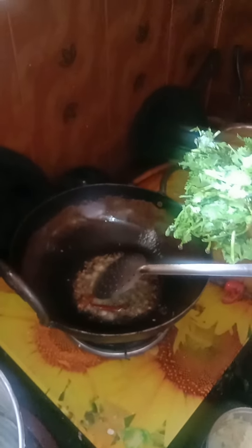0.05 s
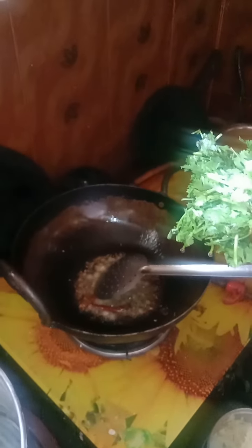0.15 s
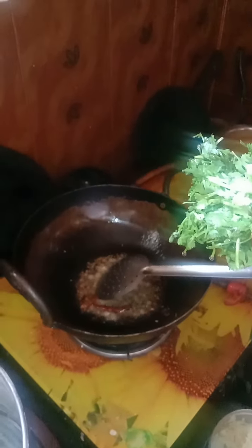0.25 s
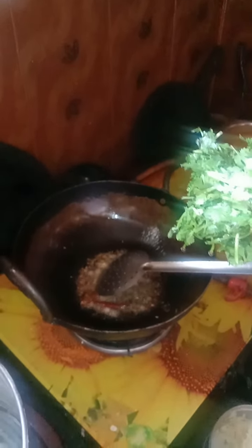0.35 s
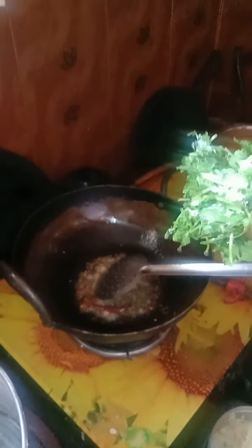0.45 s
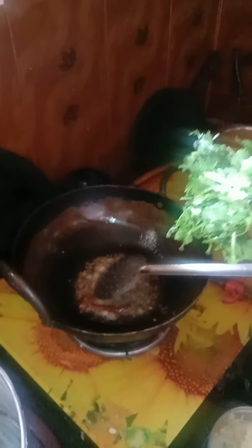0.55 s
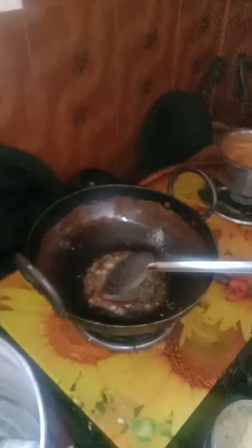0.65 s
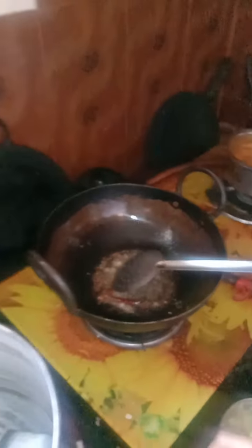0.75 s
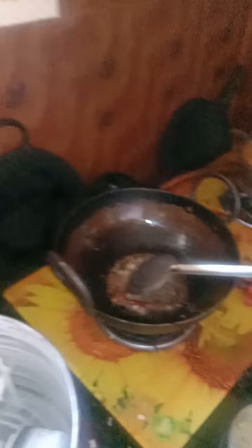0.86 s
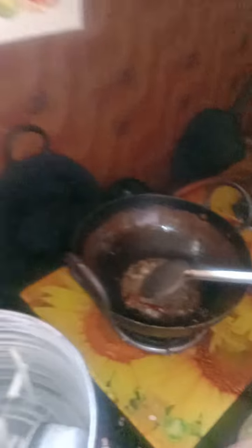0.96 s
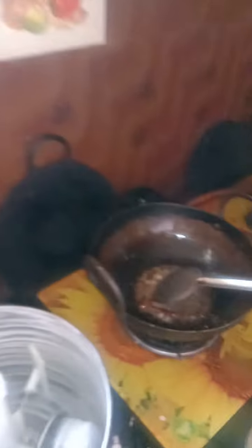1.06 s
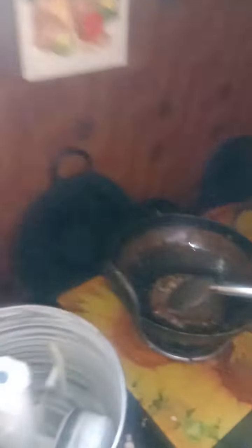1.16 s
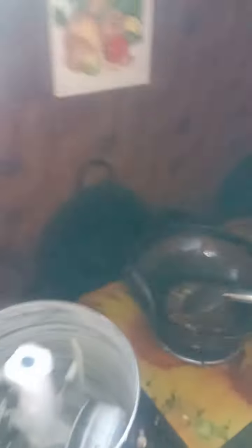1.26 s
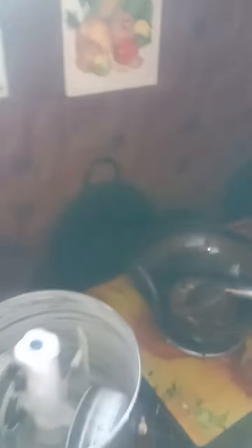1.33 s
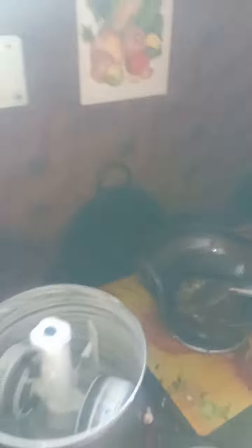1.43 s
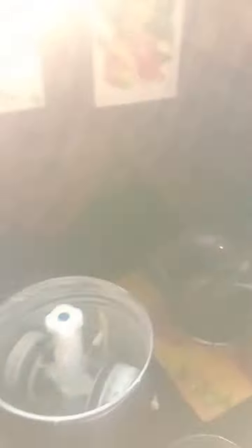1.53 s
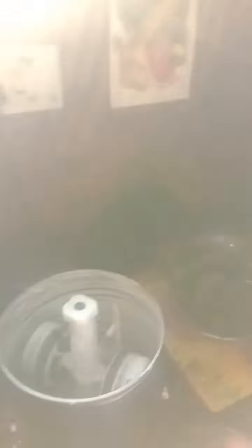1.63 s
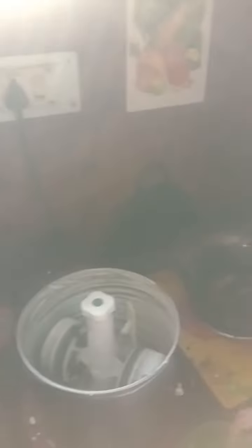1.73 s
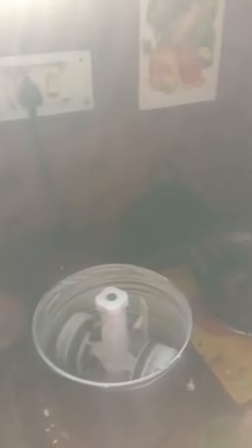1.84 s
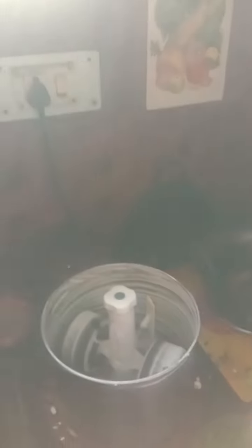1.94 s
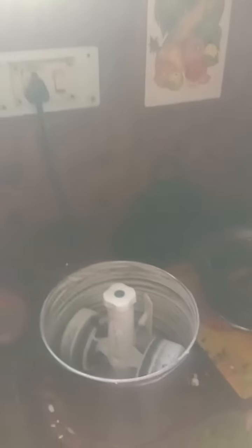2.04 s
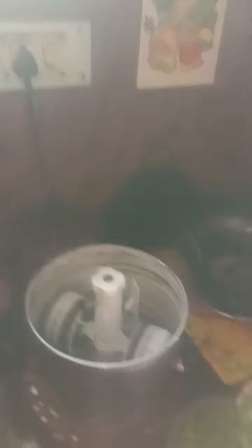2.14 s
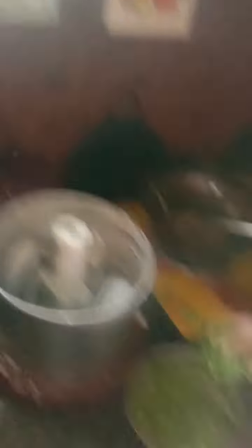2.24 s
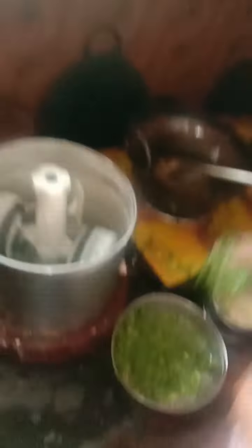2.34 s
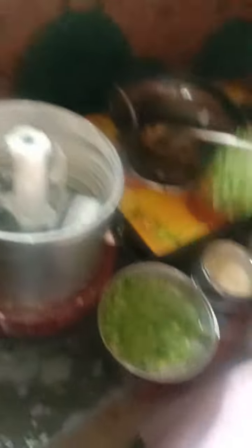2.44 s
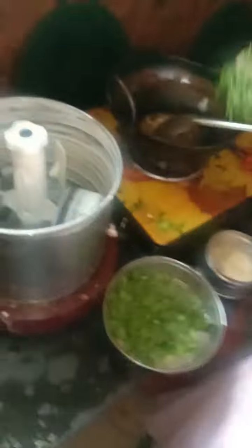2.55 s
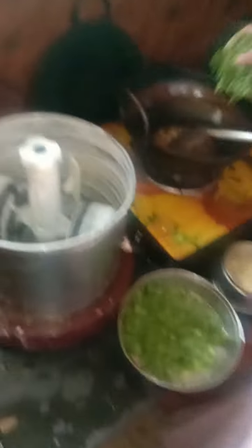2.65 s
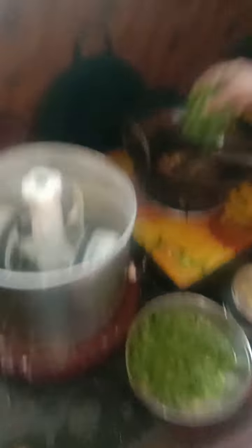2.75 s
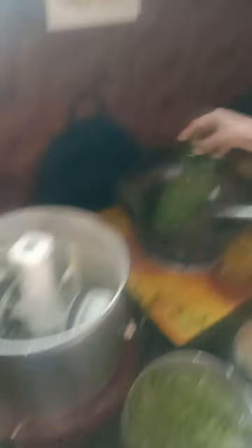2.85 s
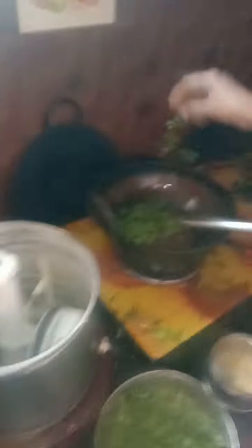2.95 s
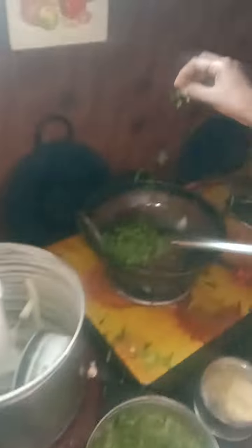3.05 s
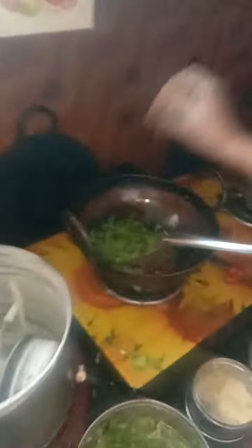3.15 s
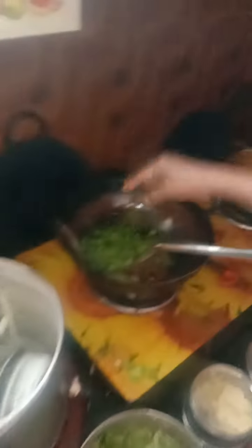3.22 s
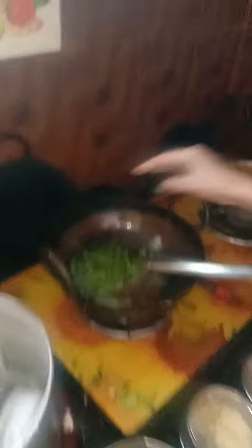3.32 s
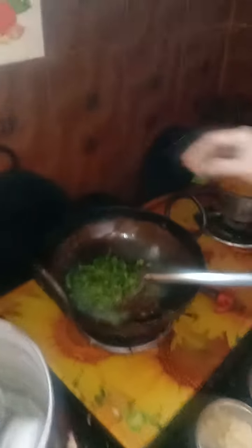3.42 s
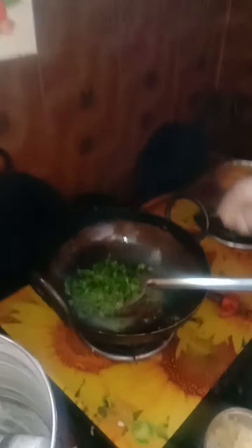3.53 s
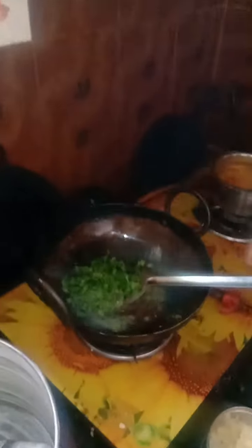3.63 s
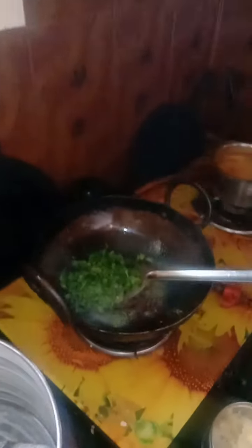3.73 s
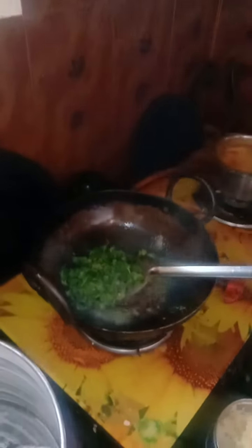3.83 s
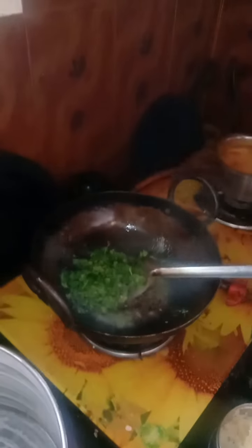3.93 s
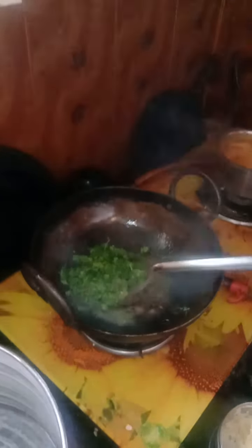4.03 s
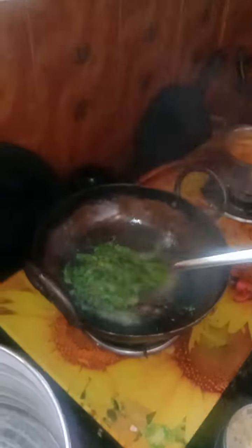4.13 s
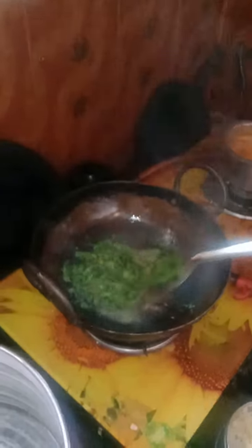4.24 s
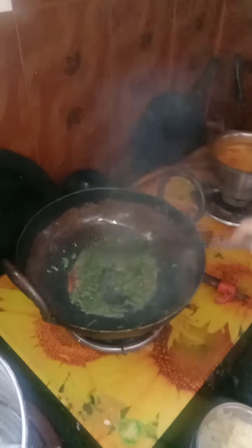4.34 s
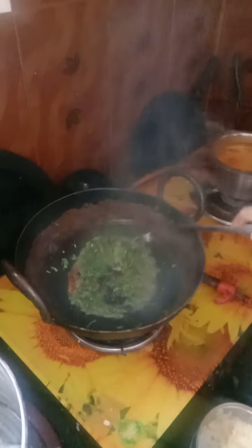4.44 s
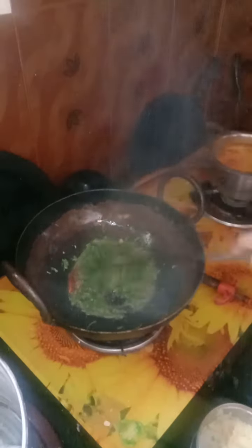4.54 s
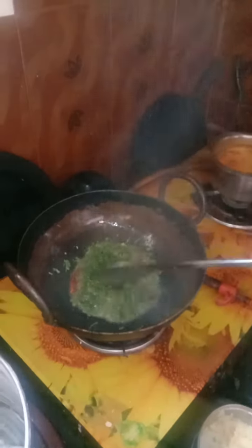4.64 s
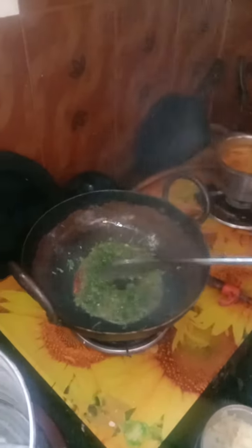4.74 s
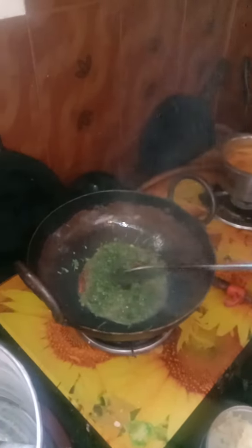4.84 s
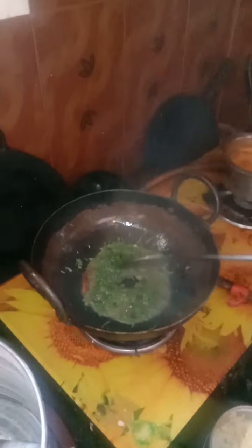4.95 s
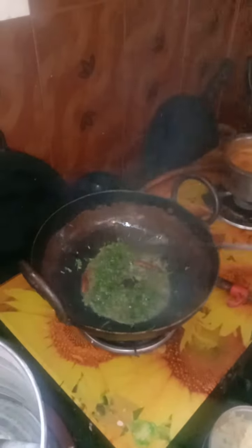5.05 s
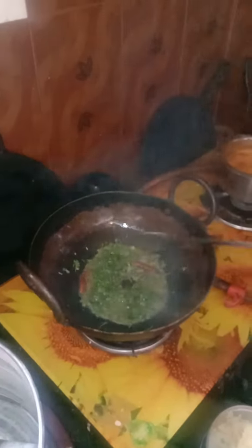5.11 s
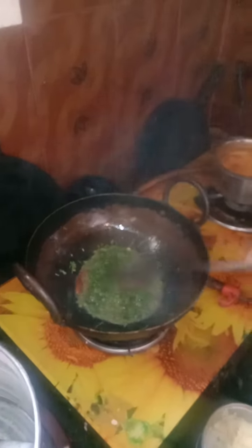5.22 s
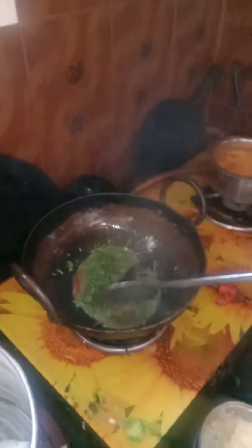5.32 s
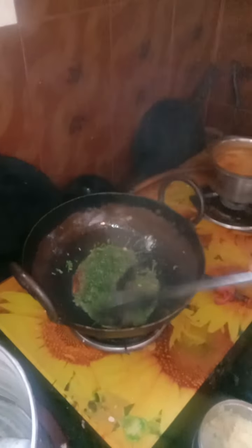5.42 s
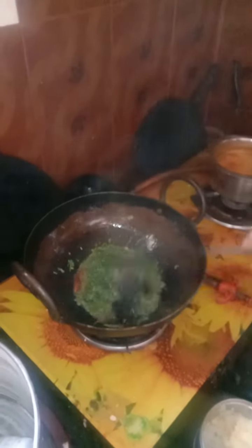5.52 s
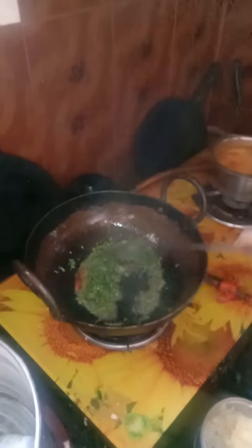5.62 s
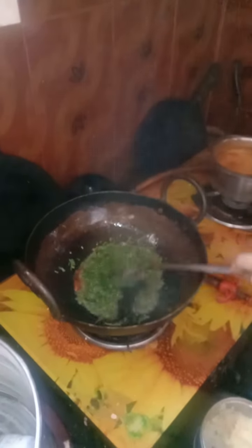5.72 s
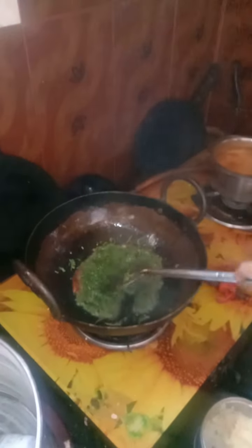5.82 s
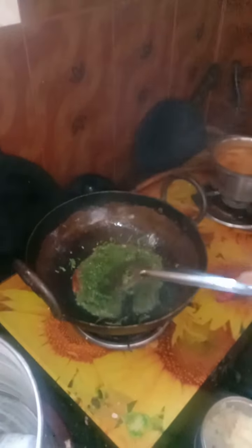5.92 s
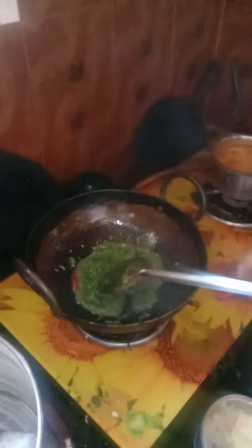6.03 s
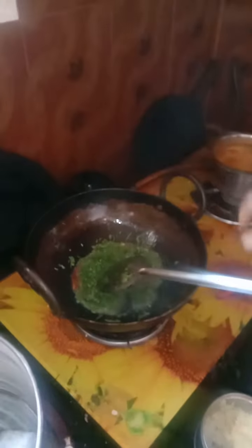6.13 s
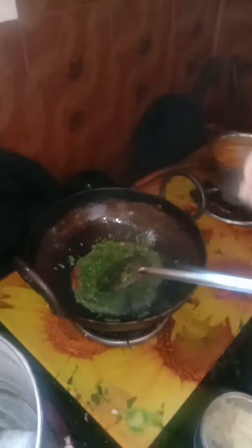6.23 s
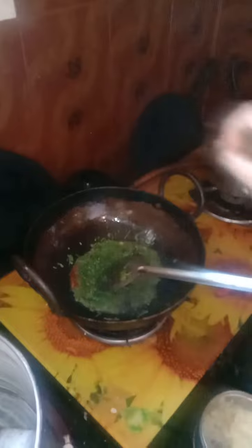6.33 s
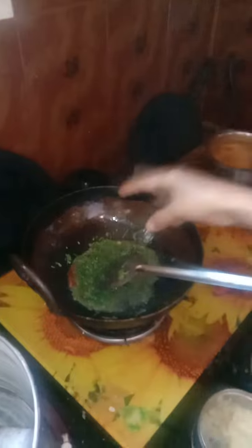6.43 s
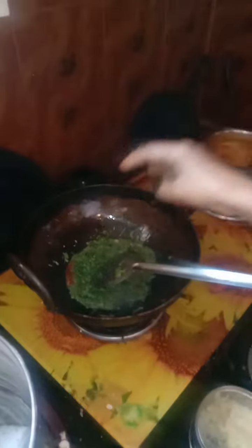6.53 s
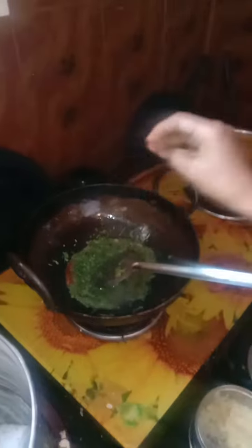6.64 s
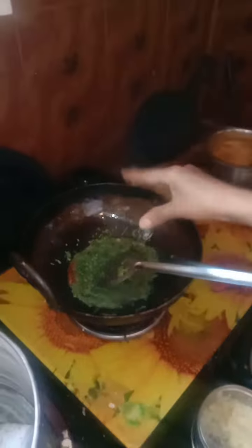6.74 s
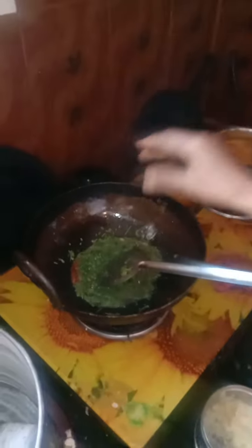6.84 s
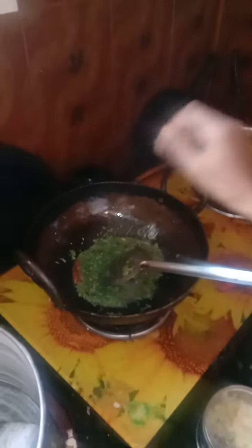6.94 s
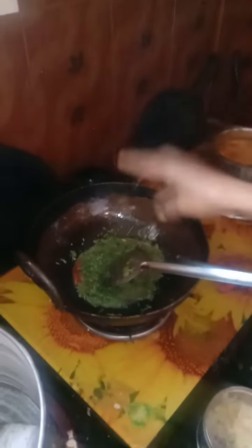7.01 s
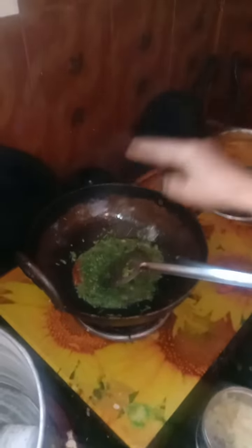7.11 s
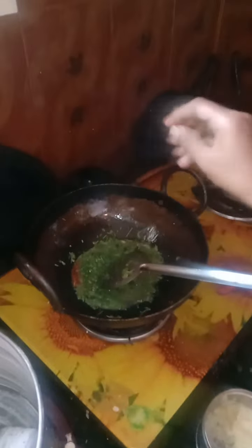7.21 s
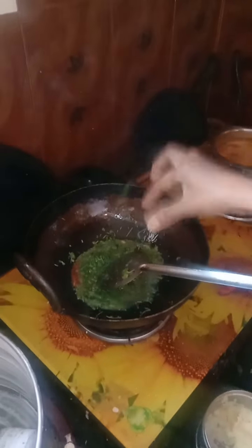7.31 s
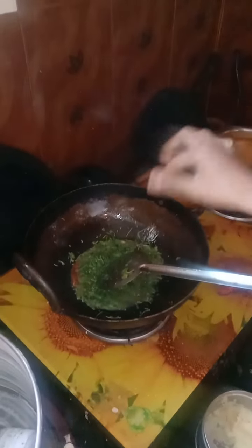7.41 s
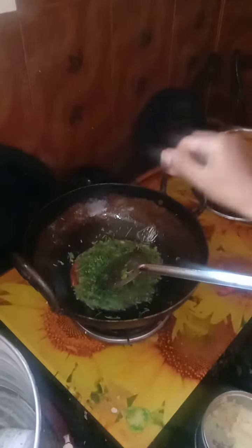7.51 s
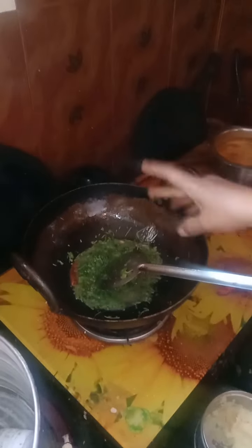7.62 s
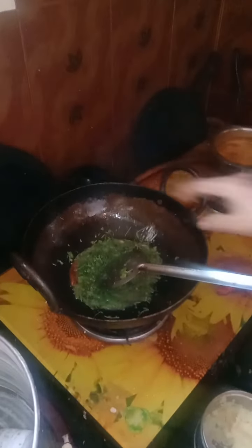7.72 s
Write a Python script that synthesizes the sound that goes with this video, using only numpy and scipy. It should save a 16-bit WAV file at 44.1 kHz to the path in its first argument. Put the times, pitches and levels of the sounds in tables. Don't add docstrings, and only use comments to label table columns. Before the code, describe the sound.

Soft, sparse crackles and small wet drips of oil come first, with faint taps and a low murmur of flame and street. Then moist leaves hit the hot pan: a sudden roaring fry, full and crackly. A metal ladle strikes and scrapes the iron, releasing a sharp puff of steam, and the sizzle sinks slowly to a steady finer fry. Small kitchen, nearby phone microphone, mono and slightly dry.

```python
import sys
import numpy as np
from scipy import signal
from scipy.fft import rfft, irfft
from scipy.io import wavfile
from scipy.ndimage import uniform_filter1d

SR = 44100
rng = np.random.default_rng(int(sys.argv[2]) if len(sys.argv) > 2 else 0)


def wrap_up_sound(samples):
    columns = np.atleast_2d(samples).T
    tamed = np.clip(columns, -1, 1)
    steps = np.round(tamed * 32767).astype(np.int16)
    wavfile.write(sys.argv[1], SR, steps)


def how_loud(loudness_db):
    steps = np.asarray(loudness_db, float) / 20
    return 10 ** steps


N = 342657

# start_s, level_db, squelch_pitch_hz, thud_db, deep_mode_share
KNOCKS = [
    (.28, -47, 852, -27, .4),
    (.69, -58, 477, -11, .4),
    (1.541, -38.5, 620, -11, 0.36),
    (4.271, -24, 676, -13.5, 0.73),
    (5.167, -24, 732, -32, 2.6),
    (5.99, -44, 690, -8.5, .4),
]
# start_s, end_s, level_db
SMOTHER = (4.246, 4.268, -5)


def evened(x):
    return x / np.sqrt(np.mean(x ** 2) + 1e-20)


def band(x, lo_hz, hi_hz):
    return signal.sosfilt(signal.butter(N=2, Wn=[lo_hz, hi_hz], btype="band", fs=SR, output="sos"), x)


def add(mix, s, sound):
    part = mix[round(s * SR):][:len(sound)]
    part += sound[:len(part)]


def drift(seconds):
    width = round(seconds * SR)
    smooth = uniform_filter1d(rng.standard_normal(N), width)
    return evened(uniform_filter1d(smooth, width))


def power_sum(*levels_db):
    return 10 * np.log10(sum(how_loud(db) ** 2 for db in levels_db))


def swells(t, rest_db, peaks, reach_s):
    humps = [np.maximum(db - 10 * ((t - s) / reach_s) ** 2, -200) for s, db in peaks]
    return power_sum(rest_db, *humps)


def colour_db(hz, points, modes):
    f, level = np.transpose(points)
    humps = sum(db / (1 + (2 * (hz - centre) / width) ** 2) for centre, width, db in modes)
    return np.interp(np.log(hz + 1), np.log(f + 1), level) + humps


def causal(gain_db):
    log_gain = np.log(how_loud(np.concatenate([gain_db, gain_db[-2:0:-1]])))
    response = np.fft.ifft(np.exp(np.conj(signal.hilbert(log_gain)))).real[:4096]
    return response / np.linalg.norm(response)


def burst_shape():
    # pitch_hz, level_db
    burst_colour = [(30, -51), (70, -47), (300, -34.5), (600, -27.5), (1000, -20.5), (1500, -12),
                    (2100, -1.5), (3200, -2), (4500, -4), (5800, -1.5), (7200, 2), (8100, -13.5),
                    (9300, -9.5), (13900, -19.5), (14800, -9), (15600, -13)]
    # pitch_hz, width_hz, level_db over the burst colour
    pan_modes = [(283, 61, 8.5), (542.5, 62, 9.5), (690, 34, 12.5), (747, 53, 10), (808, 32, 10),
                 (909, 29, 11.5), (996, 15, 5.5), (1075, 66, 2), (1260, 167, 9), (1510, 30, 2.5),
                 (2040, 45, 1.5), (2540, 250, 1.5), (2900, 120, 0), (5500, 960, 4), (6330, 200, -2.5),
                 (6670, 200, 1.5)]
    return causal(colour_db(np.fft.rfftfreq(8192, 1 / SR), burst_colour, pan_modes))


def kitchen(x, wet_db=-5.0):
    # pitch_hz, t60_s
    room_decay = [(300, 0.31), (2000, 0.074), (6000, 0.12), (14000, 0.035)]
    taps = np.zeros(SR // 4)
    at = np.arange(100, SR // 4 - 20, 20)
    taps[at + rng.integers(0, 20, len(at))] = rng.choice([-1., 1.], len(at))
    hz, t, z = signal.stft(taps, SR, nperseg=256)
    t60_s = colour_db(hz, room_decay, [])[:, None]
    tail = signal.istft(z * how_loud(-60 * t / t60_s), SR, nperseg=256)[1]
    return x + how_loud(wet_db) * signal.oaconvolve(x, tail / np.linalg.norm(tail))[:N]


def layer_levels(t):
    # time_s, level_db
    spices = [(0, -41.5), (.6, -44.5), (.75, -44), (1.05, -44), (1.35, -44), (1.58, -40), (1.7, -46.5),
              (1.92, -45), (2.17, -50), (2.32, -42.5), (2.48, -42.5), (2.63, -48), (2.8, -54), (3.0, -30.5)]
    # time_s, level_db
    leaves = [(2.88, -75), (2.903, -52), (2.94, -31), (3.0, -26), (3.067, -22), (3.14, -20), (3.33, -19),
              (3.4, -18), (3.85, -18), (4.15, -20), (4.23, -17), (4.32, -22.5), (5.05, -24.5), (5.3, -27),
              (5.96, -24.5), (6.11, -27.5), (7.1, -29.5), (7.77, -32.5)]
    # level_db at mean vigour, slope_db_per_db
    spice_laws = [
        (-66.5, 0.61),
        (-62.5, 1.2),
        (-50, 0.7),
        (-47.5, 1.05),
        (-59, 0.49),
    ]
    # level_db at mean vigour, slope_db_per_db
    leaf_laws = [
        (-52, 1.07),
        (-40, 1.25),
        (-27.5, 1.07),
        (-25.5, 1.13),
        (-33, 0.91),
    ]
    # start_s, end_s, boom_db, ring_db
    scrapes = [
        (0, 0.04, 11, -1),
        (4.474, 4.827, -2, -6),
        (4.897, 4.963, 2.5, -5),
        (5.007, 5.084, 0, -2.5),
        (5.56, 5.87, 3, 3),
        (5.928, 6.106, 0.5, -1),
        (7.414, 7.565, 0, -10.5),
    ]
    spice_mean_db, leaf_mean_db = -44.5, -25
    spray_lead_s, low_lag_s = 0.008, 0.03
    fresh_boom_db, wilted_s = 8, 4.36
    knock_boom_db, knock_boom_t60_s = -25, 0.39

    spice_db = np.interp(t, *np.transpose(spices))
    leaf_db = np.interp(t, *np.transpose(leaves))
    early_db = np.maximum(leaf_db, np.interp(t + spray_lead_s, *np.transpose(leaves)))
    late_db = np.minimum(leaf_db, np.interp(t - low_lag_s, *np.transpose(leaves)))
    vigours_db = [late_db, late_db, leaf_db, leaf_db, early_db]
    levels = []
    for (a_db, a), (b_db, b), vigour_db in zip(spice_laws, leaf_laws, vigours_db):
        from_spices = a_db + a * (spice_db - spice_mean_db)
        from_leaves = b_db + b * (vigour_db - leaf_mean_db)
        levels.append(power_sum(from_spices, from_leaves))

    levels[4] = levels[4] - 3 * np.interp(t, [1.1, 1.5], [0, 1]) * (t < leaves[0][0])
    for start, end, boom_db, ring_db in scrapes:
        drag = np.interp(t, [start - .02, start, end, end + 0.01], [0, 1, 1, 0])
        levels[0] = levels[0] + boom_db * drag
        levels[1] = levels[1] + ring_db * drag

    fresh = np.interp(t, [leaves[1][0], leaves[5][0], wilted_s, wilted_s + 0.054], [0, 1, 1, 0])
    covered = (t > SMOTHER[0] - .012) & (t < SMOTHER[1])
    boom = levels[0] + fresh_boom_db * fresh - 0.5 * (1 - fresh) * drift(0.076) - 4 * covered
    shaken = [np.where(t > s, db + knock_boom_db - 60 * (t - s) / knock_boom_t60_s, -200)
              for s, db, *_ in KNOCKS]
    levels[0] = power_sum(boom, *shaken)
    levels[1] = levels[1] + 1.1 * drift(0.066)
    return levels


def patchy(x, depth_db):
    murmur_db, murmur_top_hz = 1.5, 1100
    hz, t, z = signal.stft(x, SR, nperseg=512, noverlap=384)
    chance = rng.standard_normal(z.shape[::-1]).T
    slow = uniform_filter1d(uniform_filter1d(chance, size=20, axis=1), size=14, axis=1)
    z = z * how_loud(murmur_db * (hz < murmur_top_hz)[:, None] * evened(slow))
    field = uniform_filter1d(uniform_filter1d(chance, size=7, axis=0), size=9, axis=1)
    field = evened(uniform_filter1d(field, size=6, axis=1))
    depth = depth_db[np.minimum(t * SR, N - 1).astype(int)]
    return signal.istft(z * how_loud(field * depth), SR, nperseg=512, noverlap=384)[1][:N]


def sliding_ring(x):
    # time_s, pitch_hz
    ring_pitch = [(2.95, 1258), (4.6, 1250), (4.85, 1282), (5.45, 1285), (5.6, 1256), (5.76, 1240),
                  (5.9, 1285), (6.4, 1250), (6.7, 1280), (6.9, 1255)]
    width_hz, focus_db = 66, -4.5
    hz = np.interp(np.arange(N) / SR, *np.transpose(ring_pitch))
    turn = np.exp(2j * np.pi * np.cumsum(hz) / SR)
    r = np.exp(-np.pi * width_hz / SR)
    low = x / turn
    for _ in range(2):
        low = signal.lfilter([1 - r], [1, -r], low)
    return evened(x) + how_loud(focus_db) * evened((turn * low).real)


def frying(calm_per_s=1400, roar_per_s=5000, spread_db=3.5, steam_db=-2.0, calm_steam_db=-2.5,
           clump_db=0.5, calm_patch_db=3.0, roar_patch_db=0.5):
    layer_edges = [1150, 1380, 4200, 7800]
    t = np.arange(N) / SR
    levels = layer_levels(t)
    heat = np.clip((levels[3] + 45.0) / 27, 0, 1)
    root_heat = np.sqrt(heat)

    rate = (calm_per_s + (roar_per_s - calm_per_s) * heat ** 2) / SR
    size_steps = np.minimum(rng.exponential(1, N), 3.7 + .8 * root_heat)
    sizes = how_loud(spread_db * size_steps) * rng.choice([-1., 1.], N)
    clicks = evened(sizes * (rng.random(N) < rate) / np.sqrt(rate))
    hiss = how_loud(calm_steam_db + (steam_db - calm_steam_db) * root_heat) * rng.standard_normal(N)
    drive = (clicks + hiss) * how_loud(clump_db * drift(0.079))

    spot = rng.integers(0, 6, N)
    spread = sum(kitchen(drive * (spot == k)) for k in range(6))
    coloured = signal.oaconvolve(spread, burst_shape())[:N]
    spectrum = rfft(patchy(coloured, calm_patch_db + (roar_patch_db - calm_patch_db) * root_heat))

    layer = np.searchsorted(layer_edges, np.fft.rfftfreq(N, 1 / SR))
    out = np.zeros(N)
    for k, level_db in enumerate(levels):
        part = irfft(spectrum * (layer == k), N)
        if k == 1:
            part = sliding_ring(part)
        out += how_loud(level_db) * evened(part)if k != 1 else how_loud(level_db) * part
    start, end, smother_db = SMOTHER
    return out * how_loud(smother_db * np.interp(t, [start - .018, start, end, end + 0.0019], [0, 1, 1, 0]))


def hum():
    # pitch_hz, level_db per Hz
    hum_colour = [(15, -52), (25, -29), (70, -10), (139, -10.5), (200, 4), (249, -7), (609, -5), (700, -45),
                  (910, -55), (1540, -120)]
    # pitch_hz, width_hz, level_db
    room_modes = [(70.7, 13, 11.2), (98, 13, 4.6), (167, 20, 3.5), (289, 79, 9.1), (417.6, 32, 7.2)]
    # peak_s, level_db
    flutters = [(.47, -65), (.54, -71), (.72, -62), (.84, -62), (.96, -68), (1.09, -68), (1.23, -62),
                (1.39, -64), (2.01, -60), (2.22, -55.5), (2.38, -52), (2.53, -54), (2.79, -54.5),
                (2.86, -56), (2.94, -59), (3.16, -55), (3.47, -54), (3.69, -48.5), (3.87, -57), (4.35, -62),
                (4.75, -57), (5.05, -64), (5.19, -60), (5.82, -55), (6.05, -62), (6.52, -59.5), (6.95, -57),
                (7.2, -59.5), (7.67, -59), (7.76, -55)]
    # peak_s, level_db
    traffic = [(.03, -71), (.46, -69), (.68, -70), (.9, -76), (1.1, -68), (1.55, -66), (1.76, -70),
               (1.9, -70), (2.9, -75), (3.3, -74), (3.59, -65), (3.87, -65), (4.03, -68), (4.38, -58.5),
               (4.88, -68), (5.2, -67), (5.52, -61), (5.75, -71), (6.5, -70), (6.8, -63), (7.03, -65),
               (7.45, -78)]
    hum_db, drone_rest_db, rumble_rest_db = -57, -72, -76
    t, hz = np.arange(N) / SR, np.fft.rfftfreq(N, 1 / SR)
    noise = rfft(rng.standard_normal(N)) * how_loud(colour_db(hz, hum_colour, room_modes))

    turn = 2 * np.pi * np.cumsum(205 + 6 * drift(0.021)) / SR
    drone_db = swells(t, drone_rest_db, flutters, reach_s=0.054)
    drone = np.sqrt(2) * np.sin(turn) * how_loud(drone_db + 4.4 * drift(0.024))

    rumble_db = swells(t, rumble_rest_db, traffic, reach_s=0.13) - drift(0.068)
    rumble = how_loud(rumble_db) * evened(irfft(noise * (hz < 120), N))

    murmur_db = hum_db - 6.5 + 0.25 * (drone_db + 70.0) + 2.0 * drift(0.062)
    return how_loud(murmur_db) * evened(irfft(noise * (hz >= 120), N)) + drone + rumble


def spits(crack=3.9, ragged_db=8.0):
    # start_s, level_db, pitch_hz, t60_s
    drips = [(0.02, -24.5, 2900, 0.29), (.382, -28, 2860, .17), (0.7335, -33, 2120, 0.12),
             (1.3037, -26, 2330, 0.13), (1.4418, -25, 2870, 0.32), (1.6063, -29, 2300, 0.17),
             (1.631, -20.5, 3130, 0.19), (1.7486, -28, 3090, 0.46), (1.761, -28, 2800, 0.18),
             (1.7808, -26, 2500, 0.31), (1.8572, -25, 2840, 0.28), (2.277, -26, 2560, 0.35),
             (2.4224, -19, 2880, 0.13), (2.453, -30, 2820, .11), (2.527, -31.5, 2500, 0.43),
             (2.601, -27.5, 2820, 0.097), (2.7583, -28, 5500, 0.75), (5.989, -11.5, 2280, 0.23)]
    # start_s, level_db, pitch_hz, t60_s
    seeds = [(.054, -19.5, 5670, 0.05), (0.08, -23.5, 4560, 0.16), (0.126, -40, 5660, 0.12),
             (0.238, -22, 5830, 0.33), (0.4165, -21, 5400, 0.32), (0.4528, -16, 6200, 0.17),
             (0.9674, -25, 6700, .14), (1.0125, -23.5, 5860, 0.23), (1.0657, -23.5, 5800, .18),
             (1.385, -26, 6050, 0.22), (1.4983, -24, 5370, 0.29), (2.097, -26.5, 5900, 0.28),
             (5.1691, -7.5, 6670, 0.18)]
    # start_s, level_db, pitch_hz, t60_s
    splashes = [(0.1873, -28, 5500, .25), (0.4698, -31, 5730, 0.12), (0.5379, -23.5, 2710, 0.25),
                (0.8133, -28, 2300, 0.59), (0.847, -22, 6230, 0.31), (1.209, -30.5, 7320, 0.45),
                (1.545, -26.5, 1870, .17), (2.138, -26, 5900, 0.5), (2.671, -31, 4110, .17),
                (2.741, -35, 6840, 0.21), (6.507, -15, 6600, 0.49), (7.134, -11, 5900, 0.14)]
    # start_s, level_db, pitch_hz, t60_s
    vents = [
        (4.2735, -7.5, 2080, 0.19),
        (4.272, 0, 6800, 0.04),
        (4.7, -12, 2540, 0.15),
        (.87, -27.5, 3600, 0.26),
    ]
    # spray_db, tonal_share
    kinds = [
        (-60, 0.48),
        (-35.5, 0.45),
        (-23.5, 0.34),
        (-35, 0.7),
    ]
    hold_s, spray_rise_s = 0.011, 0.0063
    grit = 0.27
    out, shape, t = np.zeros(N), burst_shape(), np.arange(SR // 4) / SR
    for table, (spray_db, tonal) in zip([drips, seeds, splashes, vents], kinds):
        for s, db, hz, t60 in table:
            flutter = evened(uniform_filter1d(rng.standard_normal(len(t)), size=70))
            flutter = np.clip(np.maximum(flutter, 1.5 - t / .004), -2, 1.3)
            fade = how_loud(-60 * np.maximum(t - hold_s, 0) / t60)
            strength = np.linalg.norm(fade)
            hiss = rng.standard_normal(len(t))
            puff = (hiss + grit * hiss ** 3) * how_loud(ragged_db * flutter) * fade
            puff = puff * strength / np.linalg.norm(puff)
            puff[0] = crack
            whistle = band(puff, hz * 0.85, hz * 1.114)
            whistle = whistle * strength / np.linalg.norm(whistle)
            wide = signal.oaconvolve(puff, shape)[:len(t)]
            spray = how_loud(spray_db + 21.0) * band(wide, 5100, 12000)
            spray = spray * np.minimum(0.39 + t / spray_rise_s, 1)
            fizz = (1 - tonal) * band(wide, 760, 4600)
            add(out, s, how_loud(db - 14.0) * (tonal * whistle + fizz + spray))
    return out


def pops(rattle=.16, rattle_s=.0008):
    # start_s, peak_db,
    # pitch_hz
    single_bursts = [(0.054, -17, 5800), (0.4526, -19, 6600), (0.4844, -17.5, 5500), (1.207, -24, 6600),
                     (2.136, -27, 5690), (2.928, -16, 6740), (2.9627, -10.5, 6700), (3.2276, -3, 6490),
                     (4.018, -2, 6670), (4.3593, -5.5, 6400), (3.442, -9, 6600), (3.371, -3, 6000),
                     (3.713, -6, 6500), (4.531, -4, 5860), (4.543, -7, 6500), (4.702, -7, 5500),
                     (4.722, -5, 7130), (4.882, -4, 6650), (5.082, -10, 6110), (5.1994, -9, 5610),
                     (4.3963, -9, 6200), (5.3346, -7, 6890), (6.2278, -17, 6800), (6.255, -9, 6690),
                     (6.54, -8.5, 2570), (6.7533, -9, 5930), (6.8247, -14, 7200), (6.9955, -14, 7300),
                     (7.1347, -9, 5450), (7.2857, -9.5, 2500), (7.376, -9, 7000), (7.425, -9, 3120),
                     (0.187, -23, 9000), (0.301, -22, 6500), (.4174, -25, 3500), (0.538, -16, 7100),
             (.8125, -24, 6500), (.8455, -26, 6000), (1.0168, -17.5, 5800), (1.101, -27, 7200),
             (5.1695, -9, 5230), (1.443, -36, 3000), (1.631, -26, 3100), (1.452, -31, 3000),
             (1.781, -29, 2300), (.857, -18, 6500), (.983, -31, 9000), (2.744, -27, 6900),
                     (4.809, -21, 7230), (5.4394, -9, 6790), (5.5348, -7.5, 7200), (5.599, -8.5, 7210),
                 (5.63, -9, 6660), (5.7194, -11, 6900), (5.9287, -14, 5430), (5.9594, -16, 6550),
                 (5.975, -10, 5900), (6.055, -12, 6630), (6.1194, -15, 7050), (6.242, -9, 6660),
                 (6.5994, -26, 6750), (4.2673, -8, 6000), (7.134, -14, 5450), (7.425, -11.5, 4300),
                 (7.5, -12, 6970)]
    out, shape, t = np.zeros(N), burst_shape(), np.arange(300) / SR
    for s, db, hz in single_bursts:
        tear = rattle * rng.standard_normal(len(t)) * np.exp(-t / rattle_s)
        tear[0] = 1
        leaning = .6 * shape + band(shape, hz * .7, hz * 1.3)
        click = signal.oaconvolve(leaning, tear)
        add(out, s, how_loud(db - 1.5) * click / abs(click).max())
    return out


def bounces():
    # start_s, peak_db, pitch_hz
    drops = [(0.38, -30, 2920), (0.416, -27, 3720), (0.4274, -31, 2190), (0.7332, -34, 1990),
             (0.8121, -26, 2910), (0.8564, -33, 3730), (1.305, -26, 2270), (1.3154, -30, 2310),
             (1.3464, -32, 3110), (1.3548, -34, 2010), (1.4426, -17, 2950), (1.4514, -20, 3330),
             (1.4627, -18, 2900), (1.4714, -23, 3050), (1.6064, -29, 2260), (1.6304, -16, 3100),
             (1.6414, -28, 3160), (1.675, -29, 3140), (1.6844, -32, 3360), (1.7809, -26, 2250),
             (1.7944, -27, 2200), (1.8557, -22, 2960), (1.8642, -24, 3050), (1.8844, -28, 3030),
             (2.2767, -27, 2030), (2.4222, -24, 2700), (2.456, -24, 2730), (4.2745, -1, 2135),
             (4.2825, -8, 2120), (4.2895, -4, 2050), (5.1682, -10, 5250), (5.169, -9, 6930),
             (5.17, -8.5, 2400), (4.2715, -8, 5660)]
    # start_s, peak_db, pitch_hz
    cracks = [(0.0782, -25, 5500), (0.1246, -22, 5700), (0.175, -25, 5530), (0.2124, -27, 6660),
              (0.2369, -33, 5700), (0.427, -24, 5200), (0.444, -23, 6600), (0.5764, -27, 7560),
              (0.5964, -31, 6330), (0.6034, -26, 5800), (0.8565, -25, 6430), (1.4247, -25, 5450),
              (2.4219, -28, 6670), (2.758, -25, 5500), (2.807, -28, 5460), (2.836, -30, 5400),
              (2.8679, -36, 5870), (2.8923, -28, 5920)]
    t60_s = .022
    out, t = np.zeros(N), np.arange(2000) / SR
    for s, db, hz in drops + cracks:
        turn = 2 * np.pi * hz * t
        ring = np.sin(turn) + 0.17 * np.sin(1.19 * turn) + 0.35 * np.sin(0.73 * turn)
        add(out, s, how_loud(db - 4.5 - 60 * t / t60_s) * np.minimum(t / 0.00085, 1) * ring)
    return out


def murmurs():
    # middle_s, level_db, pitch_hz, width_hz, length_s
    mode_swells = [(5.18, -33.5, 740, 110, .036), (1.3, -58.5, 690, 50, .09), (5.221, -48, 260, 200, 0.072),
                   (4.279, -29.5, 727, 80, 0.024), (2.76, -68, 960, 800, .24), (4.338, -41, 700, 30, .07),
                   (1.664, -42, 3230, 500, 0.066), (0.281, -56, 850, 300, 0.072),
                   (0.719, -58, 470, 200, 0.11), (.81, -58, 503, 60, .05), (0.848, -63, 700, 60, 0.075),
                   (.54, -49, 1260, 80, 0.035), (0.829, -50, 1270, 200, 0.075),
                   (1.041, -55, 1220, 60, 0.046), (1.43, -55, 1270, 60, 0.081),
                   (1.848, -59, 447, 60, 0.067), (1.914, -60, 320, 150, 0.056),
                   (2.113, -58.5, 297, 50, .08), (2.27, -55, 280, 50, 0.069), (2.54, -52, 1480, 250, 0.058),
                   (2.59, -56, 1240, 60, 0.11), (4.298, -31, 1420, 300, .045), (4.325, -39, 284, 30, .1),
                   (4.51, -48, 793, 80, 0.055), (4.58, -48.5, 818, 50, 0.073), (4.73, -48, 807, 50, 0.099),
                   (4.919, -49, 750, 120, 0.12), (5.02, -48, 750, 150, 0.073), (5.08, -46, 785, 100, 0.053),
                   (4.598, -33, 1264, 60, 0.069), (4.846, -45.5, 1320, 50, 0.046),
                   (4.949, -33.5, 1272, 70, 0.052), (5.95, -49.5, 538, 40, 0.12),
                   (5.993, -47, 725, 60, 0.12), (6.66, -54, 807, 50, 0.2), (7.009, -51, 700, 60, 0.049),
                   (7.3, -53, 730, 120, 0.13), (7.528, -48, 784, 70, .1), (7.69, -52, 816, 50, .07)]
    # middle_s, level_db, pitch_hz, width_hz, length_s
    mists = [(.885, -57, 15000, 1200, .06), (.865, -58, 12500, 2500, .05), (1.03, -56, 15000, 1200, .06),
             (1.025, -52, 10300, 1500, .04), (1.24, -63, 15000, 1200, .09), (1.57, -63, 15000, 1200, .07),
             (2.155, -57, 14900, 1400, .05), (2.155, -53, 11500, 3000, .05), (2.39, -58, 15000, 1200, .07),
             (.46, -65, 15000, 1200, .08)]
    # start_s, length_s, from_hz, to_hz, level_db
    whistles = [
        (.095, .075, 12800, 13600, -65),
        (1.125, .06, 12450, 13300, -69),
    ]
    out = np.zeros(N)
    for s, db, hz, width_hz, length in mode_swells + mists:
        count = round(length * SR)
        noise = band(rng.standard_normal(12000), hz - width_hz / 2, hz + width_hz / 2)[-count:]
        add(out, s - length / 2, how_loud(db) * evened(noise) * np.sqrt(np.hanning(count)))
    for s, length, from_hz, to_hz, db in whistles:
        hz = np.linspace(from_hz, to_hz, round(length * SR))
        tone = np.sin(2 * np.pi * np.cumsum(hz) / SR)
        add(out, s, how_loud(db) * tone * np.sqrt(np.hanning(len(hz))))
    return out


def knocks():
    t60, glide, thud_hz, deep_hz = .22, 1.05, 278.4, 176
    out, t = np.zeros(N), np.arange(SR // 3) / SR
    for s, db, hz, thud_db, deep in KNOCKS:
        pitch_hz = hz * (1 + (glide - 1) * np.minimum(t / 0.015, 1.5))
        turn = 2 * np.pi * np.cumsum(pitch_hz) / SR
        overtones = np.sin(turn) + .3 * np.sin(2 * turn) + .9 * np.sin(3 * turn)
        squelch = 0.58 * overtones * how_loud(-60 * t / (0.31 * t60))
        noise = rng.standard_normal(len(t))
        rattle = evened(band(noise, hz * 1.58, hz * 2.8)) * 0.41 * how_loud(-60 * t / t60)
        body = evened(band(noise, hz * 0.99, hz * 1.2)) * 0.17 * how_loud(-60 * t / (1.5 * t60))
        modes = np.sin(2 * np.pi * thud_hz * t) + deep * np.sin(2 * np.pi * deep_hz * t)
        thud = 0.81 * modes + 0.64 * evened(band(noise, 180, 480))
        thud = how_loud(thud_db) * thud * how_loud(-60 * t / (1.4 * t60)) * np.minimum(t / .04, 1)
        attack = np.minimum(t / .0015, 1)
        add(out, s, how_loud(db) * (squelch + body + rattle + thud) * attack)
    return out


def rings():
    # pitch_hz, level_db, t60_s
    rung_modes = [(700, -5.5, 0.24), (828, -3.5, 0.38), (1260, -4, 0.19), (1416, 0.5, 0.28),
                  (1587, 1.5, .25), (1820, -7, .25)]
    # start_s, level_db
    touches = [
        (1.541, -54),
        (1.551, -60),
        (4.271, -41),
        (4.283, -44),
        (4.325, -38),
        (5.167, -40),
        (5.205, -38),
        (5.99, -42.5),
        (3.0, -44),
    ]
    out, t = np.zeros(N), np.arange(SR // 3) / SR
    ring = sum(how_loud(db - 60 * t / t60) * np.sin(2 * np.pi * hz * t) for hz, db, t60 in rung_modes)
    ring = ring * np.minimum(t / 0.001, 1)
    for s, db in touches:
        add(out, s, how_loud(db) * ring)
    return out


def scene():
    struck = pops() + knocks() + bounces() + rings()
    near = kitchen(spits(), wet_db=-2.0) + kitchen(struck, wet_db=-6.5)
    return np.tile(frying() + near + hum() + murmurs(), (2, 1))


def roll_off(x):
    return signal.sosfilt(signal.butter(12, 15710, fs=SR, output="sos"), x)


def record(dry):
    # middle_s, from_hz, to_hz, level_db
    splits = [(3.315, 7600, 9000, -41), (3.59, 6300, 7550, -24), (4.129, 5160, 6360, -27.5),
              (4.13, 10300, 12000, -40), (6.655, 4600, 7100, -32), (6.655, 8200, 9800, -47),
              (6.655, 11000, 12600, -51), (6.68, 11500, 15400, -50), (6.865, 4240, 7100, -36),
              (6.865, 13800, 15400, -51), (7.61, 9600, 12600, -48)]
    side, hz = np.zeros(N), np.fft.rfftfreq(1800, 1 / SR)
    for s, lo_hz, hi_hz, db in splits:
        noise = irfft(rfft(rng.standard_normal(1800)) * (hz > lo_hz) * (hz < hi_hz))
        add(side, s - 900 / SR, how_loud(db) * evened(noise) * np.hanning(1800))
    loud = np.tanh(dry / 1.275) * 1.133 + side * [[1], [-1]]
    edge = signal.firwin(1023, 15500, window=("kaiser", 9), fs=SR)
    return roll_off(signal.oaconvolve(loud, edge[None], "same"))


dry = scene()
out = record(dry)
wrap_up_sound(out)
```